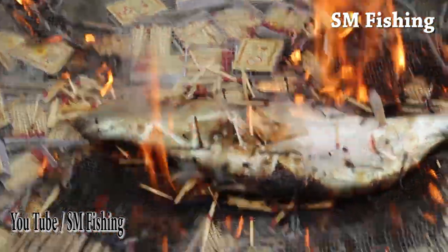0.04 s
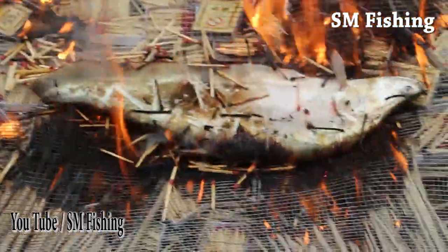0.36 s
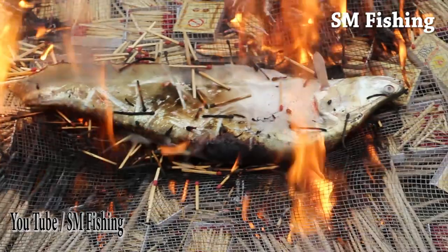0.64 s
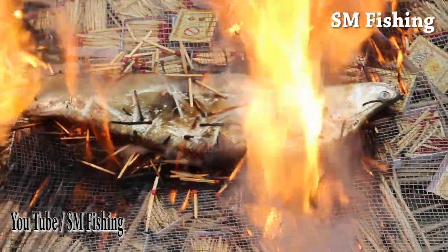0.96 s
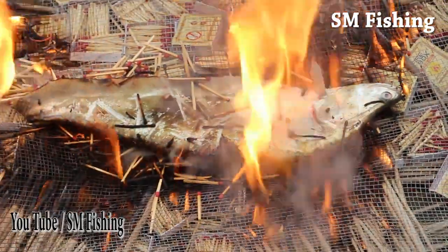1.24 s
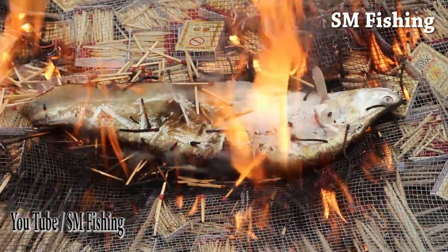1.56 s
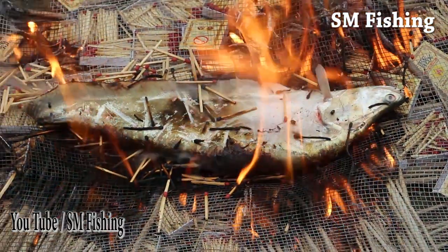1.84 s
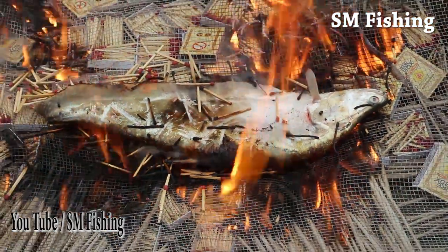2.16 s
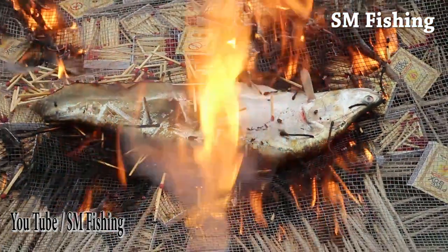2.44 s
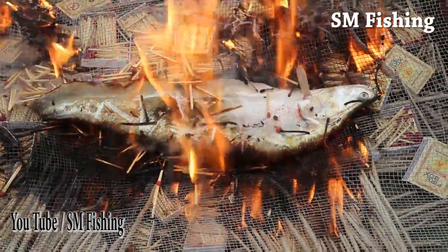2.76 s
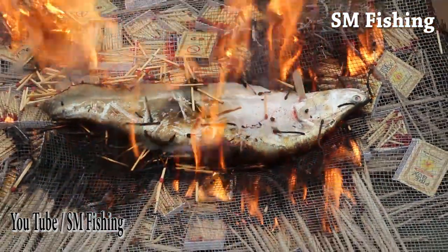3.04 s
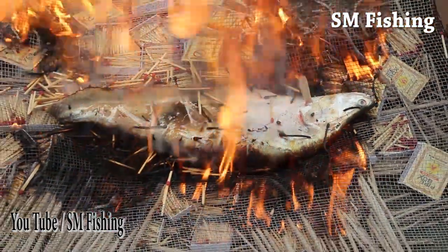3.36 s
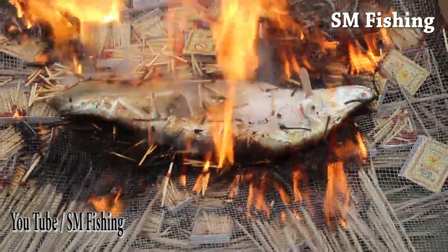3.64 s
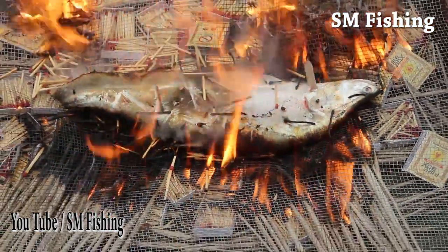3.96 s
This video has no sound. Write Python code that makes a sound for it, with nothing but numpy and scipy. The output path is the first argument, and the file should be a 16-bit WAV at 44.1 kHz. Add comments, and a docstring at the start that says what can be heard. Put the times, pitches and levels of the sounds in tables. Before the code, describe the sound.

Close fire whooshes and hisses in surges as matches burn, with crackles and bird whistles outdoors.

```python
"""Heaps of matches flaring up outdoors

Three heaps of matches catch fire in turn, close by and to the left. In each flare, swirling gas
makes a low roar, a rush and a high hiss, and the match heads fizz. Sticks crackle over the steady
rumble of the flames. One bird gives four falling whistles; another clucks softly towards the end."""
import sys
import numpy as np
from scipy import signal
from scipy.fft import rfft, irfft
from scipy.io import wavfile
from scipy.ndimage import uniform_filter1d

SR = 44100
rng = np.random.default_rng(int(sys.argv[2]) if len(sys.argv) > 2 else 0)


def output_pcm(signal):
    """Save a mono or channel-first signal as 16-bit PCM at the path in sys.argv[1].

    Samples are clipped to [-1, 1] before scaling.
    """
    pcm = np.clip(np.atleast_2d(signal).T, -1, 1) * 32767
    wavfile.write(sys.argv[1], SR, np.round(pcm).astype(np.int16))


N = 176400  # 4 seconds
T = np.arange(N) / SR  # time of each sample
HZ = np.maximum(np.arange(N // 2 + 1) * SR / N, 1)  # frequency of each point in a spectrum


def undb(db):
    """Turn decibels into a number to multiply by."""
    return 10 ** (np.asarray(db) / 20)


def unit(x):
    """Scale a signal so that its average strength (rms) is 1."""
    return x / np.sqrt(np.mean(x ** 2))


def curve(table, column=1):
    """Join the points of a table column into a curve over all frequencies."""
    points = np.array(table, float)
    return np.interp(np.log(HZ), np.log(points[:, 0]), points[:, column])


def pan(db):
    """Left and right gains that make the left side louder by db."""
    left = undb(db)
    return 2 * np.vstack([left, np.ones_like(left)]) / (1 + left)


def wander(per_s):
    """A smooth random wobble, about 1 in size."""
    hold = max(int(SR / per_s), 2)
    steps = np.repeat(rng.standard_normal(N // hold + 1), hold)
    return unit(uniform_filter1d(uniform_filter1d(steps, hold), hold)[:N])


def tiny_pops(per_s, spread_db=3.5):
    """Tiny pops at random moments, a few much larger than the rest."""
    size = undb(spread_db * np.minimum(rng.exponential(size=N), 5))
    happens = rng.random(N) < per_s / SR
    return unit(happens * size * np.sign(rng.standard_normal(N)))


def band(x, hz, octaves):
    """Keep mostly the sound within some octaves either side of hz."""
    edges = np.clip([hz / 2 ** octaves, hz * 2 ** octaves], 20, .48 * SR)
    return signal.sosfilt(signal.butter(1, edges, "band", fs=SR, output="sos"), x)


def at_fire(make_spectrum, right_lead_s=.000022):
    """Place a sound in the fire: to the left, with the high notes more spread out."""
    # where the fire is heard (frequency [Hz], left minus right [dB], likeness of the sides [0-1])
    fire_stereo = [(200, 10.5, 0.97), (800, 9.5, 0.6), (2000, 6.5, 0.8), (4500, 3, 0.72), (7700, 5, 0.64),
                   (14000, 1, 0.66)]
    likeness = curve(fire_stereo, column=2)
    middle = make_spectrum() * np.sqrt((1 + likeness) / 2)
    side = make_spectrum() * np.sqrt((1 - likeness) / 2)
    earlier = np.exp(2j * np.pi * np.minimum(HZ, 2500) * right_lead_s)
    return np.array([middle + side, (middle - side) * earlier]) * pan(curve(fire_stereo))


def outdoors(call, pan_db, echo_db, die_away_s=0.27, wall_delay_s=0.029):
    """A call bounces back clearly from a wall, and in a blur from the ground and trees."""
    t = T[:SR // 2]
    scatter = rng.standard_normal(len(t)) + rng.standard_normal((2, len(t)))
    echoes = scatter * undb(-60 * t / die_away_s) * (t > 0.0034)
    echoes /= np.sqrt(np.sum(echoes ** 2, axis=1, keepdims=True))
    echoes[:, int(wall_delay_s * SR)] += undb(-7.5)
    reflected = signal.fftconvolve(call[None], echoes, axes=1)[:, :N]
    return (call + undb(echo_db) * reflected) * pan(pan_db)


def rumble(level_db=-49.5):
    """The steady low noise of the flames and the open air."""
    # tone of the rumble (frequency [Hz], relative level [dB])
    colour = [(20, -28), (35, -17.5), (60, -9.5), (115, -1), (200, -7.5), (400, -13), (1000, -21),
              (4000, -24.5), (9000, -37), (15000, -35)]
    noise = at_fire(lambda: rfft(rng.standard_normal(N)))
    air = irfft(noise * undb(curve(colour)), N)
    return air / air.mean(axis=0).std() * undb(level_db)


def clucks(throat_hz=1020, pitch_arch=0.087, roughness=0.0559):
    """A bird's short notes glide and arch in pitch, with faint overtones and a rasp from the throat."""
    # one cluck a row (start [s], length [s], glide from [Hz], glide to [Hz], level [dB],
    # rasp compared with the tone [dB]); the arch pulls both ends of the glide lower
    notes = [(2.704, 0.008, 540, 523, -35, -16), (2.729, 0.0178, 528, 445, -38.5, -3),
             (3.449, 0.058, 780, 1060, -38.5, -10), (3.583, 0.01, 1050, 1160, -36, -5),
             (3.599, 0.022, 930, 806, -37, -19), (3.684, 0.045, 890, 910, -37, -9),
             (3.794, 0.05, 830, 873, -45, -9), (3.917, 0.044, 860, 855, -44, -9)]
    out, waver = 0, 1 + roughness * wander(600)
    breath = band(rng.standard_normal(N), throat_hz, octaves=0.3)
    rasp = unit(band(breath, throat_hz, octaves=0.24))
    for start, length, from_hz, to_hz, db, rasp_db in notes:
        progress = np.clip((T - start) / length, 0, 1)
        arch = np.maximum(np.sin(np.pi * progress), 0)
        glide_hz = from_hz + (to_hz - from_hz) * progress
        phase = 2 * np.pi * np.cumsum(glide_hz * (1 + pitch_arch * (arch - 1)) * waver) / SR
        octave = undb(-14) * throat_hz / glide_hz * np.sin(2 * phase)
        buzz = undb(-18) * (np.sin(4 * phase) + np.sin(5 * phase))
        voice = np.sin(phase) + octave + buzz + undb(rasp_db) * rasp
        out += np.sqrt(2 * arch) * undb(db) * voice
    flutter = undb(2 * wander(250))
    return outdoors(out * flutter, pan_db=9, echo_db=-13)


def whistles(fade_s=0.0078, left_lag_s=.000062):
    """A bird's clear tone slides down, nearly levels off, then plunges, louder and rougher."""
    # one whistle a row (base level [dB], eight points of (time [s], pitch [Hz])); the points are
    # start, first bend, start and end of the flatter part, loudest point, plunge, last bend, finish
    calls = [(-34, [(1.232, 6620), (1.278, 5570), (1.294, 4890), (1.328, 4700), (1.355, 3780),
             (1.369, 3490), (1.379, 3300), (1.39, 3200)]), (-32.5, [(1.548, 6870), (1.582, 6400),
             (1.598, 5840), (1.641, 5330), (1.649, 4250), (1.664, 3470), (1.673, 2680), (1.692, 2440)]),
             (-27, [(2.465, 6180), (2.506, 5430), (2.522, 4700), (2.553, 4360), (2.567, 4050),
             (2.583, 3430), (2.599, 2994), (2.618, 2963)]), (-26, [(3.378, 5790), (3.441, 4950),
             (3.460, 4200), (3.476, 3920), (3.49, 3595), (3.503, 3450), (3.514, 3040), (3.522, 2600)])]
    # swell of a whistle at those eight points (added level [dB])
    swell_db = (-11, -19.5, -6, -4, 2, -2, -8.5, -9.5)
    out, wobble = 0, wander(900)
    for db, points in calls:
        times, hz = np.array(points).T
        roughness = np.interp(T, times[3:5], [0.00465, .016])
        phase = 2 * np.pi * np.cumsum(np.interp(T, times, hz) * (1 + roughness * wobble)) / SR
        fade = np.clip(np.minimum(T - times[0], times[-1] - T) / fade_s + .5, 0, 1)
        tone = np.sin(phase) + undb(-29) * np.sin(2 * phase)
        out += np.sqrt(2) * tone * fade * undb(db + np.interp(T, times, swell_db))
    left, right = outdoors(out, pan_db=0, echo_db=-2)
    late_left = irfft(rfft(left) * np.exp(-2j * np.pi * HZ * left_lag_s), N)
    return np.array([late_left, right])


def crackles(tail_s=0.0088, spray_s=0.013, tick_s=0.0012):
    """Burning sticks snap, each inside a spray of finer pops; faint ticks go on throughout."""
    # sharp cracks and dull pops (time [s], peak before panning [dB], centre [Hz], decay time [s])
    snaps = [(.047, -31.5, 2520, 0.0022), (.085, -33.5, 300, 0.002), (0.2103, -36, 5600, .001),
             (0.8986, -24, 10300, .0004), (0.933, -19, 4000, 0.0014), (.993, -29, 650, .004),
             (1.4496, -43, 9000, .001), (1.613, -31, 8000, .001), (1.618, -26, 2700, .001),
             (1.7647, -37, 4000, .001), (1.808, -33.5, 9000, .003), (1.8856, -28.5, 10000, 0.0043),
             (1.919, -39, 9000, .002), (1.991, -29.5, 10000, 0.00042), (2.381, -26, 3000, 0.00068),
             (2.552, -26, 4480, .002), (2.712, -35, 140, .004), (2.781, -36, 90, .004),
             (2.958, -21.5, 4500, 0.0043), (3.1485, -20.5, 5470, 0.0013), (3.178, -25, 7000, 0.0022),
             (3.9659, -35, 8050, 0.0022)]
    out, t = np.zeros((2, N + SR)), T[:SR // 20]
    spray = tiny_pops(per_s=560) + np.array([tiny_pops(per_s=560) for _ in range(2)])
    for start, db, hz, decay_s in snaps:
        burst = rng.standard_normal(len(t)) + 1.1 * rng.standard_normal((2, len(t)))
        decay = np.exp(-t / decay_s) + undb(-14) * np.exp(-t / tail_s)
        snap = band(burst * decay, hz, octaves=0.24)
        i = int(start * SR)
        out[:, i:i + len(t)] += snap / abs(snap).max() * undb(db)
        spray_gain = np.exp(-abs(T - start) / spray_s) * undb(db - 18)
        out[:, :N] += unit(band(spray, hz, octaves=0.53)) * spray_gain
    pops = tiny_pops(per_s=140)
    one_tick = np.exp(-t / tick_s) * rng.standard_normal((2, len(t)))
    ticks = signal.fftconvolve(pops[None], one_tick, axes=1)[:, :N]
    ticks = undb(-58) * unit(band(ticks, hz=5000, octaves=0.92))
    return (out[:, :N] + ticks) * pan(2.5)


def singing_jet(width_hz=1200):
    """A narrow jet of gas sings with a high hiss as the first flare dies down."""
    # course of the jet (time [s], centre [Hz], level [dB])
    course = [(.88, 7700, -58), (1.02, 7760, -48), (1.171, 8230, -48), (1.27, 7830, -66)]
    times, hz, db = np.array(course).T
    low_pass = signal.butter(2, width_hz / 2, fs=SR, output="sos")
    swirl = signal.sosfilt(low_pass, rng.standard_normal(N) + 1j * rng.standard_normal(N))
    phase = 2 * np.pi * np.cumsum(np.interp(T, times, hz)) / SR
    hiss = unit(np.real(swirl * np.exp(1j * phase)))  # moves the low noise up to the centre
    return hiss * np.interp(T, times, undb(db), left=0, right=0) * pan(5)


def gas():
    """The spectrum of swirling gas, with more fizz from the match heads towards the high end."""
    fizz_share = np.clip(0.39 * np.sqrt(HZ / 6000), 0, .95)
    swirl = rfft(rng.standard_normal(N))
    fizz = rfft(tiny_pops(per_s=7000))
    return np.sqrt(1 - fizz_share) * swirl + np.sqrt(fizz_share) * fizz


def shimmer(fire, depth_db=2, width_hz=670, length_s=.13, full_from_hz=3100):
    """As the flames sway, broad patches of the hiss grow louder and softer."""
    hz, _, cells = signal.stft(fire, SR, nperseg=512)  # a grid of frequency by time
    sway = rng.standard_normal(cells.shape[1:])
    patch_size = (width_hz / hz[1], length_s * sway.shape[1] * SR / N)
    for axis, span in enumerate(patch_size):
        for _ in range(2):
            sway = uniform_filter1d(sway, int(span), axis=axis)
    swing_db = depth_db * np.minimum(hz / full_from_hz, 1)[:, None]
    return signal.istft(cells * undb(swing_db * unit(sway)), SR)[1][:, :N]


def flares(handovers_s=(1.95, 2.62), blend_s=0.083, flutter_db=1.55, flutter_per_s=30.25):
    """Three heaps burn in turn; roar, rush and hiss swell and flutter with the flame."""
    # strength of the flames before trim and flutter (time [s], roar [dB], rush [dB], hiss [dB])
    flaring = [(0, -51, -52.5, -67), (0.12, -54.5, -61.5, -66), (0.25, -56.5, -51.5, -63),
               (0.4, -51, -47, -59.5), (0.55, -46.5, -43.5, -48), (0.68, -43.5, -45, -45),
               (0.77, -39.5, -38.5, -44), (0.93, -38, -39.5, -45.5), (1.03, -40.5, -38, -46),
               (1.16, -45, -46, -50.5), (1.24, -53.5, -52, -58.5), (1.32, -62, -63, -56.5),
               (1.44, -48.5, -54, -59.5), (1.51, -53.5, -47, -55), (1.62, -56.5, -54, -56),
               (1.75, -60.5, -54, -57), (1.85, -54.5, -52.5, -58.5), (1.93, -69, -62, -57.5),
               (2.0, -65, -61.5, -61), (2.06, -53, -53, -59.5), (2.16, -55.5, -48.5, -52),
               (2.22, -46.5, -41.5, -46), (2.32, -49, -40.5, -41), (2.385, -40, -39, -40.5),
               (2.49, -47, -41.5, -49), (2.62, -51.5, -51, -52.5), (2.76, -41.5, -46, -51),
               (2.88, -48.5, -41.5, -46.5), (3.02, -45, -39.5, -46.5), (3.19, -39.5, -34, -46.5),
               (3.3, -42, -35.5, -49), (3.42, -46, -39, -49.5), (3.57, -50.5, -42.5, -47.5),
               (3.67, -51.5, -51, -49), (3.83, -56, -48, -55.5), (4.0, -55.5, -48.5, -59.5)]
    # ranges of the roar, rush and hiss (lowest [Hz], highest [Hz])
    ranges = [(200, 700), (1200, 2300), (7000, 15000)]
    # tone of each burning heap (frequency [Hz], relative level [dB])
    first_heap = [(88, -43), (150, 1), (193, -6), (274, 2.5), (308, -2), (361, -1.5), (492, -5),
                  (543, -12.5), (598, -4), (740, 0.5), (1060, -5), (1280, -8), (1470, -3), (1710, -7.5),
                  (2250, -6), (2570, -4), (2740, -8), (2880, -13), (3400, -13.5), (4120, -13.5),
                  (5520, -10), (6300, -16), (7990, -17), (10300, -21), (15800, -27.5)]
    second_heap = [(88, -37), (150, -8), (308, -2), (375, -2), (564, -9), (756, -2.5), (937, -5.5),
                   (1070, -4.5), (2580, -5.5), (3140, -13), (4370, -12.5), (5000, -17.5), (12300, -24),
                   (15800, -35)]
    third_heap = [(88, -32), (150, -4), (197, -10), (405, -3), (553, -7), (622, -1.5), (866, 0),
                  (1120, -7.5), (1550, 1.5), (2000, 1), (2250, -5.5), (2480, -0.5), (3320, -9),
                  (5000, -9.5), (5630, -12.5), (12300, -21), (15800, -29.5)]
    to_second, to_third = [np.clip((T - when) / blend_s + .5, 0, 1) for when in handovers_s]
    shares = [1 - to_second, to_second * (1 - to_third), to_third]
    times, *levels = np.array(flaring).T
    gains = [undb(np.interp(T, times, db) + trim_db + flutter_db * wander(flutter_per_s))
             for db, trim_db in zip(levels, (-0.5, -0.5, -1))]
    centres = np.log(ranges).mean(axis=1)
    # three overlapping filters split the gas into roar, rush and hiss
    filters = [np.interp(np.log(HZ), centres, row) for row in np.eye(3)]
    bass_cut = 1 / np.sqrt(1 + (150 / HZ) ** 6)
    out, flame = 0, at_fire(gas)
    for colour, share in zip((first_heap, second_heap, third_heap), shares):
        heap = flame * undb(curve(colour)) * bass_cut
        for (low, high), gain, band_filter in zip(ranges, gains, filters):
            in_range = heap.mean(axis=0)[(HZ > low) & (HZ < high)]
            strength = np.sqrt(2 * np.sum(abs(in_range) ** 2)) / N
            out += irfft(heap * band_filter, N) / strength * gain * np.sqrt(share)
    return out


def scene():
    """The fire close by, with two birds around it."""
    fire = shimmer(flares()) + singing_jet() + rumble() + crackles()
    return fire + whistles() + clucks()


def record(dry, top_hz=15900):
    """Cut away the very highest sounds."""
    return signal.sosfilt(signal.ellip(12, .2, 85, top_hz, fs=SR, output="sos"), dry)


dry = scene()
out = record(dry)
output_pcm(out)
```